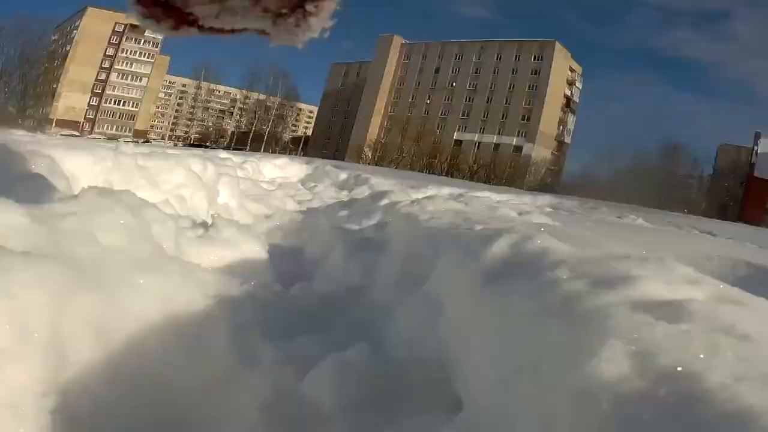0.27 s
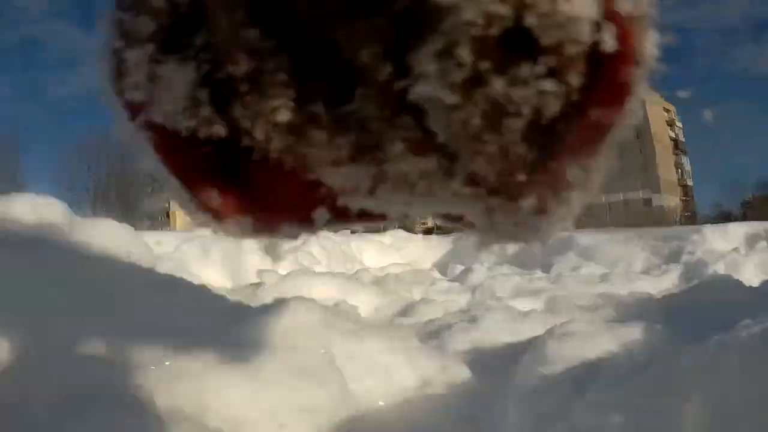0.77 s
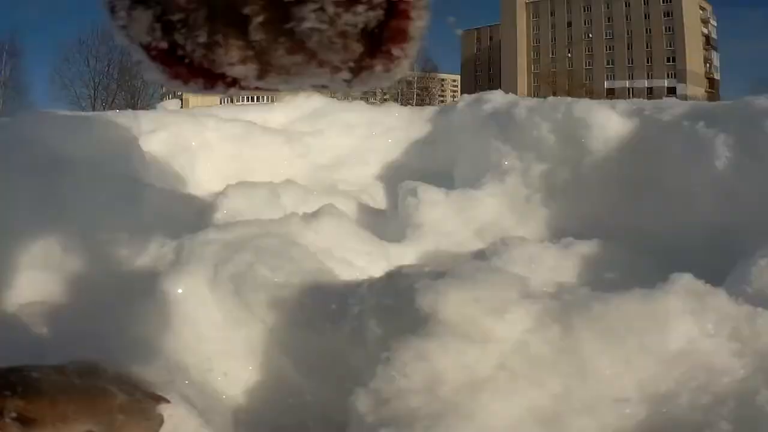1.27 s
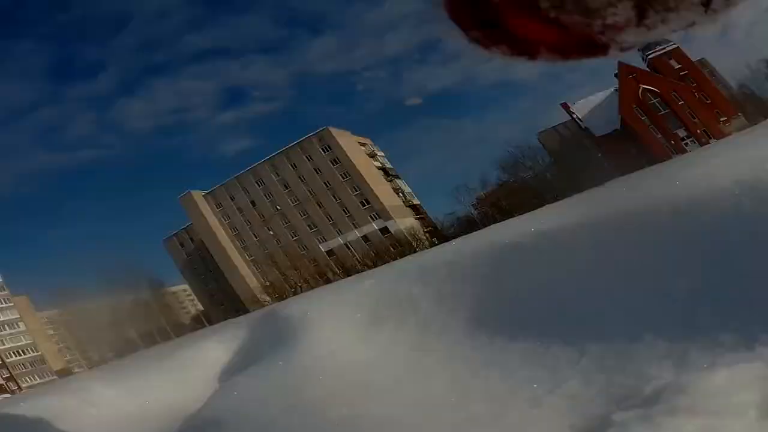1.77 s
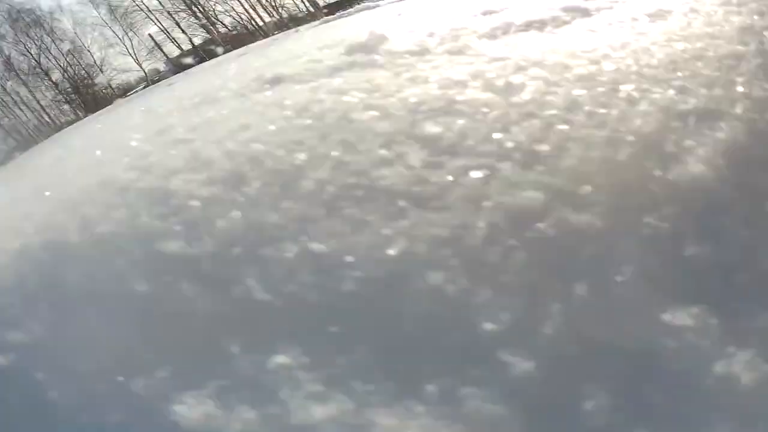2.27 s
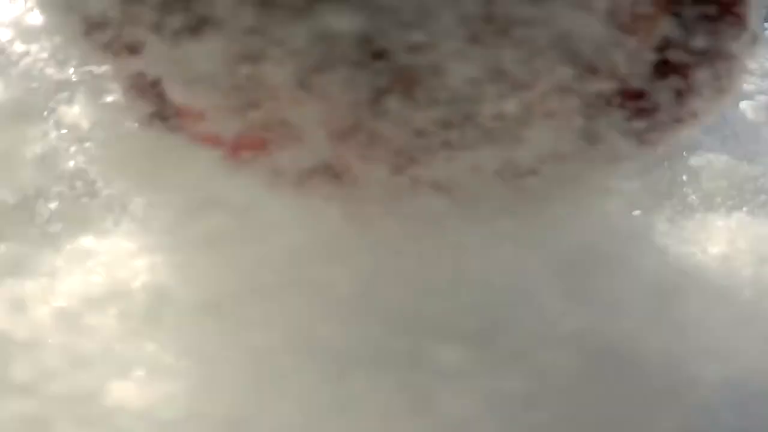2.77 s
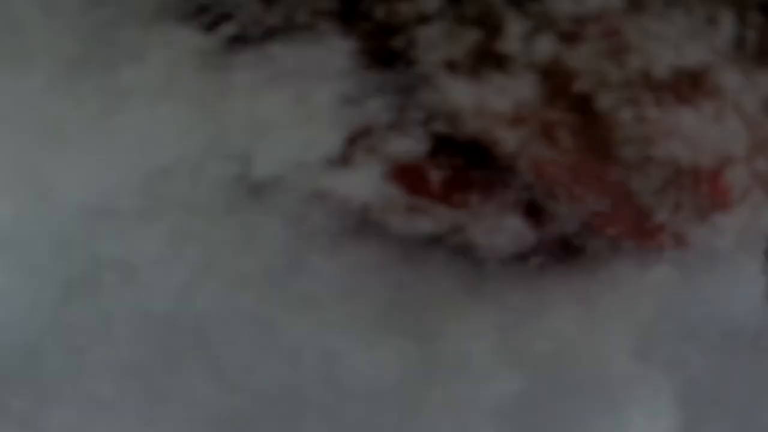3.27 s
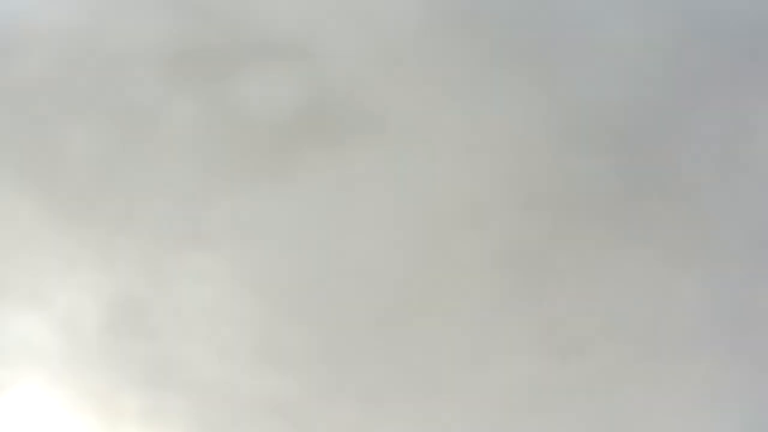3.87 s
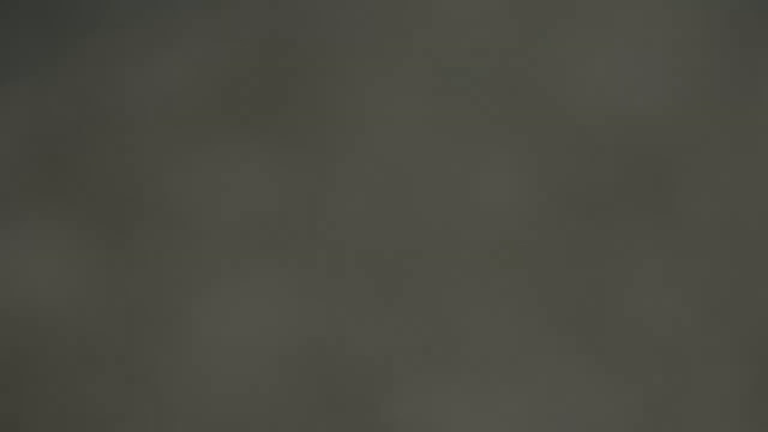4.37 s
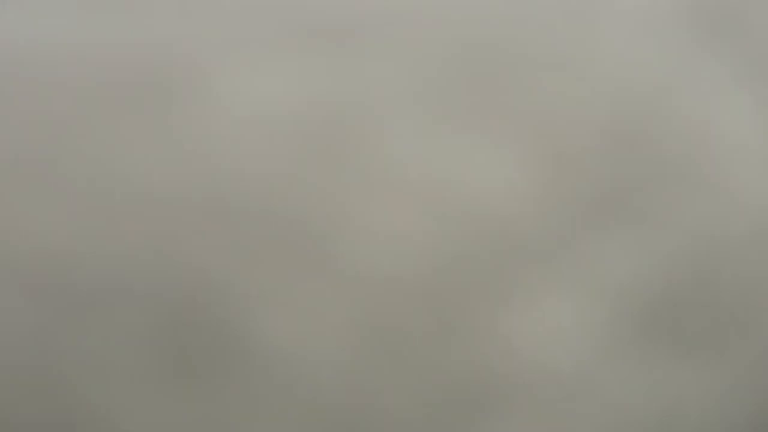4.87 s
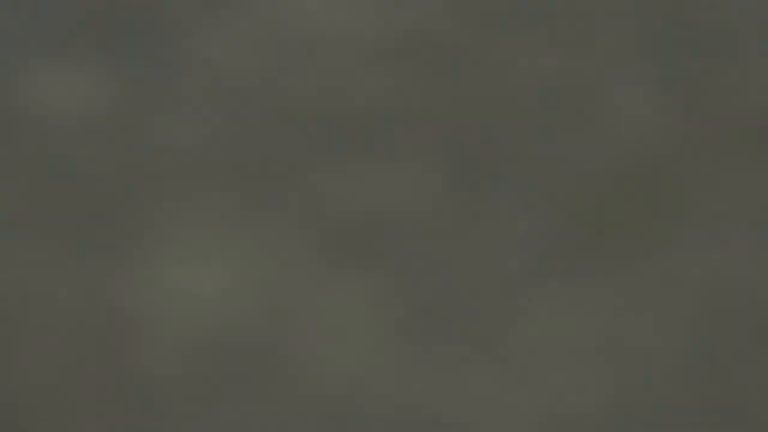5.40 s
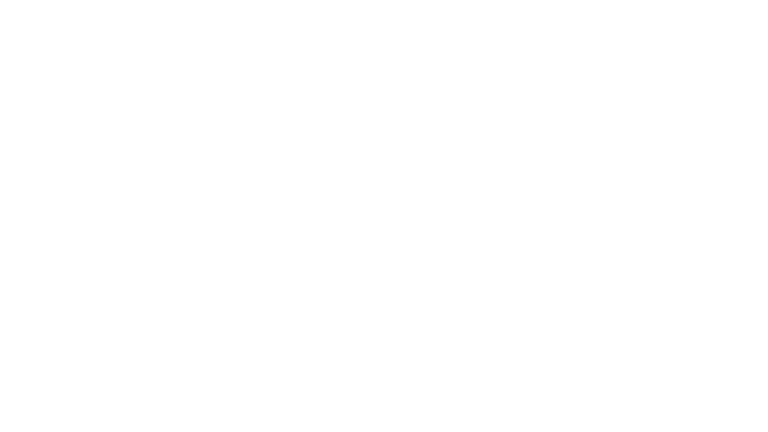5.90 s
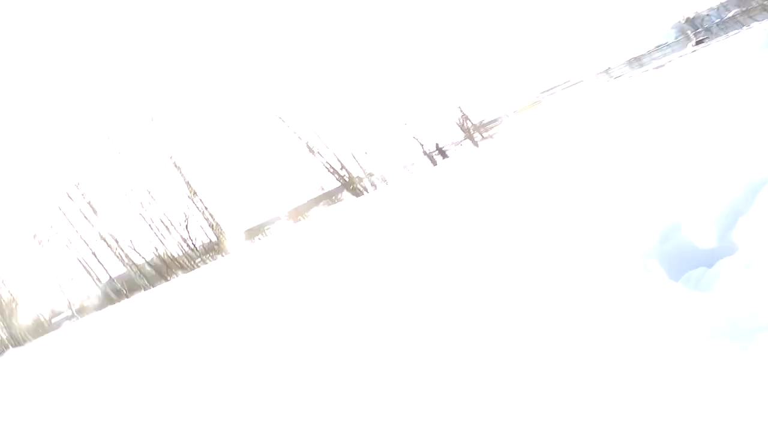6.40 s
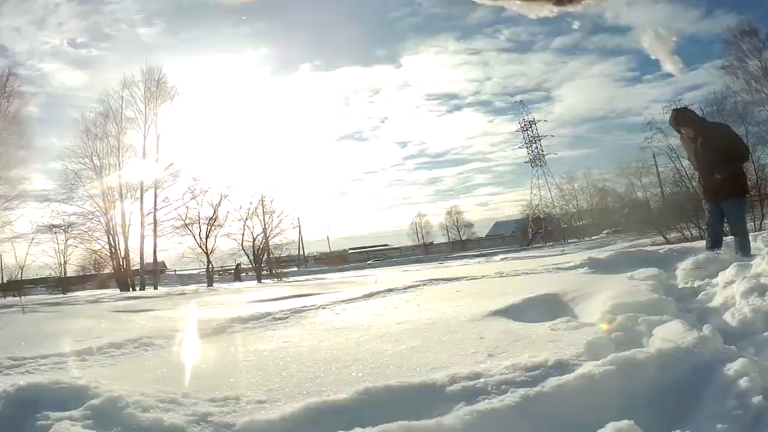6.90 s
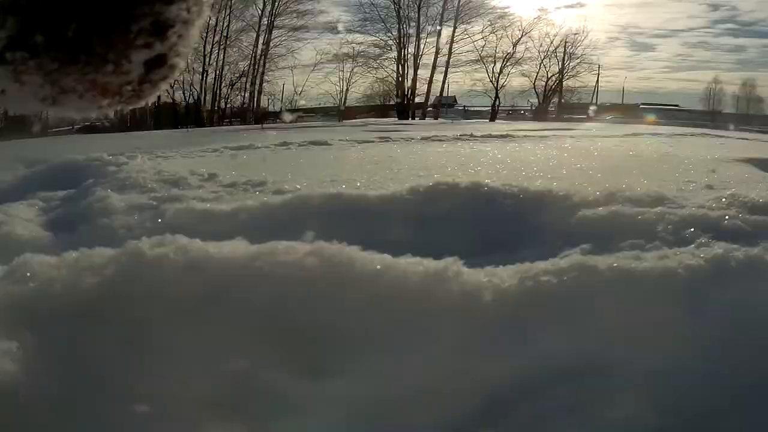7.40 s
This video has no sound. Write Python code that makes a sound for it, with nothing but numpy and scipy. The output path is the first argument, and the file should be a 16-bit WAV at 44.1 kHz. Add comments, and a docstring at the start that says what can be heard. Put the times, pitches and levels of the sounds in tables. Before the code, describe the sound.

Close on a small camera's own microphone, outdoors in snow. Irregular dry knocks hit the plastic shell, densest and loudest in the first two seconds, with a few thumps overloading. Low rumble and grainy snow crunches lie beneath. Later knocks thin out, snow hisses softly over the microphone around four to five seconds, a short gritty crunch follows near six, then small clicks fade into faint air noise.

```python
"""Small camera bumped and dragged through snow

Heard outdoors through the camera's own casing, over faint steady air and preamp noise.
Hard and dull knocks ring the plastic shell modes; pushes on the microphone port are pressure bumps
that overload it. Snow hisses as fluttering noise and crunches as random grains ringing the shell.
Slow handling rumble, made of low noise, lies underneath."""
import sys
import numpy as np
from scipy import signal
from scipy.fft import rfft, irfft
from scipy.io import wavfile
from scipy.ndimage import uniform_filter1d

SR = 44100
rng = np.random.default_rng(int(sys.argv[2]) if len(sys.argv) > 2 else 0)


def inscribe(sig):
    """Save sig as 16-bit PCM at rate SR to the path in sys.argv[1].

    A 1-D sig is mono; a 2-D sig holds one channel per row.
    Samples are clipped to [-1, 1] before scaling.
    """
    pcm = np.round(np.clip(np.atleast_2d(sig).T, -1, 1) * 32767)
    wavfile.write(sys.argv[1], SR, pcm.astype(np.int16))


N = 337365

# Knocks on the shell. Each row: start in seconds, peak in dB before the low-pass,
# centre of the sound in Hz (hard contacts are high).
KNOCKS = [(0.0464, -24.5, 990), (0.0552, -20.5, 833), (0.0704, -18, 764), (0.0835, -29.5, 1507),
          (0.0870, -22, 1507), (0.1185, -19.5, 1600), (0.1226, -19.5, 1218), (0.1386, 2.5, 2386),
          (0.241, -41, 4398), (0.303, -44, 772), (0.3731, -10.5, 3060), (0.4741, -35, 1500),
          (0.4875, -28.5, 1310), (0.4966, -5, 861.5), (0.518, -33, 800), (0.5656, -36.5, 763),
          (0.622, 10.5, 906.6), (0.653, -5.5, 3114), (0.683, -29.5, 770), (0.7174, -19.5, 1289),
          (0.73, -4.5, 3004), (0.8483, -16.5, 1288), (0.936, -33, 1204), (0.9955, 4, 1163),
          (1.0024, 3.5, 2354), (1.029, -38.5, 1322), (1.059, -32, 1714), (1.071, -26.5, 1261),
          (1.1029, -28, 880), (1.129, -35, 900), (1.141, -27.5, 1091), (1.1543, -25.5, 1156),
          (1.2332, -8.5, 1528), (1.2539, -35.5, 964), (1.2685, -33, 1328), (1.525, -11.5, 2278),
          (1.771, -18, 2240), (1.818, -27.5, 1806), (1.8644, -22.5, 1990), (1.9147, -21.5, 2150),
          (1.9319, -5, 1539), (1.9503, -6, 1110), (1.973, -30, 1502), (2.076, -46, 902),
          (2.101, -45.5, 1801), (2.1461, -46, 1034), (2.258, -43, 814.6), (2.285, -43, 1087),
          (2.333, -30, 730), (2.3378, -35, 820), (2.3775, -13.5, 2002), (2.3836, -29, 1772),
          (2.6104, -12, 885.6), (2.617, -18, 1014), (2.6379, -12.5, 895), (2.7215, -30.5, 1350),
          (2.848, -42, 598), (2.882, -39.5, 1069), (2.8926, -26, 863.5), (2.961, -36, 1117),
          (2.9848, -31.5, 1266), (3.0152, -37, 1410), (3.1343, -19, 1462), (3.1431, -20.5, 702),
          (3.177, -30.5, 909), (3.2664, -30.5, 1276), (3.3723, -30, 1419), (3.3768, -22.5, 1501),
          (3.432, -11, 3215), (3.4356, 1, 2105), (3.4397, -16, 2590), (3.4803, -12.5, 2986),
          (3.485, -16.5, 800), (3.653, -30, 1914), (3.677, -19, 1714), (3.6798, -15, 2540),
          (3.6837, -21.5, 2200), (3.842, -36, 2370), (3.918, -34.5, 1331), (3.942, -38.5, 1292),
          (4.007, -36, 1398), (4.181, -43.5, 791.6), (4.812, -23, 1104), (4.851, -28, 800),
          (4.897, -32.5, 1000), (4.989, -34, 1332), (4.9928, -37, 1611), (5.0399, -19.5, 700),
          (5.0468, -11.5, 844.7), (5.059, -23, 905), (5.0818, -32.5, 1357), (5.18, -33, 742),
          (5.904, -34.5, 1422), (5.9911, -35, 1169), (6.002, -42, 1300), (6.016, -44, 2970),
          (6.0583, -26, 983.3), (6.08, -30, 851.3), (6.1088, -18, 1465), (6.1133, -27, 1389),
          (6.155, -30, 1262), (6.212, -34, 694), (6.2295, -39.5, 939), (6.239, -24, 682),
          (6.3157, -36.5, 760), (6.352, -40.5, 702.7), (6.3666, -30, 1544), (6.4494, -9, 2230),
          (6.457, -27, 1979), (6.475, -12.5, 930), (6.5731, -28, 1236), (6.757, -58, 782.7),
          (6.9078, -49, 1060), (6.92, -38.5, 1290), (6.9489, -37, 525), (7.1024, -35, 1400),
          (7.187, -52, 1206), (7.3105, -24, 1166), (7.577, -49, 871)]
# Modes of the plastic shell. Each row: frequency in Hz, relative level in dB, t60 in seconds.
SHELL = [(590, -9, 0.007), (820, 1, 0.0028), (1200, 3, 0.0056), (1527, 2.5, 0.01), (2073, 0, 0.0047),
         (3102, -3.5, 0.0046), (3820, -6, 0.0054), (4640, -7.5, 0.0043), (5240, -8.5, 0.0046),
         (6680, 1, 0.0036), (8000, -7, 0.003)]
# How hard the camera is handled. Each row: time in seconds, rumble level in dB.
HANDLING = [(0.0, -38), (0.44, -43), (0.6, -31), (1.129, -43), (1.293, -36), (1.5, -52), (1.989, -40),
            (2.331, -50), (2.53, -41), (3.45, -35.5), (3.686, -41.5), (3.883, -37.5), (4.35, -57.5),
            (4.76, -48.5), (4.93, -34), (5.06, -38), (5.3, -43.5), (5.4, -59), (5.53, -69), (5.62, -44),
            (6.188, -41), (6.551, -34.5), (6.8, -63.5), (6.92, -47), (7.25, -55), (7.341, -45),
            (7.649, -48)]


def from_db(db):
    """Gain of a level in dB."""
    return 10 ** (np.asarray(db) / 20)


def rms_one(x):
    """Scaled to rms 1."""
    return x / np.sqrt(np.mean(x ** 2) + 1e-20)


def in_time(rows):
    """Joins (seconds, value) rows into a curve, one value a sample."""
    return np.interp(np.arange(N) / SR, *np.transpose(rows))


def drift(rate_hz):
    """Slow random curve of rms about 1: noise through a double pole at rate_hz."""
    step = 40   # samples between computed values
    pole = np.exp(-2 * np.pi * rate_hz * step / SR)
    white = rng.standard_normal(N // step + 2002)
    slow = signal.lfilter([1], [1, -2 * pole, pole ** 2], white)[2000:]   # settled part
    return np.interp(np.arange(N) / step, np.arange(len(slow)), rms_one(slow))


def coloured(x, spectrum):
    """Shaped by a (Hz, dB) spectrum joined on a log axis."""
    hz, level_db = np.transpose(spectrum)
    grid_hz = np.maximum(np.arange(N // 2 + 1) * SR / N, 1)
    gain_db = np.interp(np.log(grid_hz), np.log(hz), level_db)
    return irfft(rfft(x) * from_db(gain_db), N)


def add(out, start_s, sound):
    """Mixes a short sound in from start_s."""
    i = max(round(start_s * SR), 0)
    out[i:i + len(sound)] += sound[:N - i]


def in_band(x, lo_hz, hi_hz):
    """Scaled so that the given band has rms 1."""
    sos = signal.butter(4, [lo_hz, hi_hz], "band", fs=SR, output="sos")
    return x / np.std(signal.sosfilt(sos, x))


def packing(tail):
    """Bursts of pressure that swell fast and die slower: gains of the ringing and of the dull part."""
    # Snow packing against the shell. Each row: middle in seconds, crunch level in dB, length in ms,
    # dull thud against the crunch in dB.
    scrape_rows = [(0.064, -49, 71, 6), (0.301, -59, 18, 13.5), (1.2, -52.5, 110, -4),
                   (0.843, -45.5, 13, -3), (1.291, -58, 40, -1.5), (1.388, -64.5, 53, -4),
                   (0.491, -40.5, 18, 7), (0.555, -63, 150, 10), (0.719, -29, 14, -6.5),
                   (1.251, -49, 28, -6.5), (1.822, -63, 112, 5), (1.943, -34.5, 24, 4.5),
                   (2.008, -57.5, 25, 0.5), (2.343, -51.5, 54, 5), (2.566, -52.5, 74, -5.5),
                   (2.629, -43.5, 45, 1.5), (2.733, -42, 26, -13.5), (2.81, -62.5, 58, -6),
                   (2.889, -51, 25, 13.5), (3.062, -58.5, 30, 6.5), (3.147, -35.5, 20, 1.5),
                   (3.316, -60.5, 20, 0), (3.46, -39, 58, -12.5), (3.683, -37, 24, -5.5),
                   (4.12, -68, 270, 10.5), (4.551, -67, 270, 9), (4.821, -45.5, 31, 3), (5.185, -50, 31, 3),
                   (5.772, -26.5, 70, -20.5), (5.895, -54, 53, -6), (6.031, -61.5, 90, 6),
                   (6.133, -54, 37, 5), (6.223, -57.5, 25, 6.5), (6.32, -56, 34, 4), (6.458, -52, 34, 3.5),
                   (6.915, -57.5, 27, 2.5), (7.079, -67.5, 50, -0.5)]
    shake_db, shake_follows, shake_ms, shake_late_s = -39, 0.53, 6.8, 0.0041
    shake_thud_db, thud_fall_db = 6, 9   # the thud falls per octave of knock centre above 1 kHz
    shaken_rows = []   # every knock shakes the snow
    for s, peak_db, centre_hz in KNOCKS:
        level_db = shake_db + shake_follows * peak_db
        thud_db = shake_thud_db - thud_fall_db * np.log2(centre_hz / 1000)
        shaken_rows.append((s + shake_late_s, level_db, shake_ms, thud_db))

    ringing, dull = np.zeros((2, N))
    for s, level_db, ms, thud_db in [*scrape_rows, *shaken_rows]:
        t = np.arange(-ms, 3 * ms, 1000 / SR) / ms
        falloff = np.where(t < 0, 4 * t ** 2, (np.abs(t) / tail) ** 1.5)
        burst = from_db(level_db) * np.exp(-falloff)
        add(ringing, s - ms / 1000, burst)
        add(dull, s - ms / 1000, burst * from_db(thud_db))
    return ringing, dull


def still_air():
    """Still air and preamp: steady coloured noise."""
    # Noise spectrum. Each row: frequency in Hz, relative level in dB per Hz.
    air_spectrum = [(120, -35.5), (200, 6), (1560, -18.5), (7000, -28.5), (12000, -34.5), (15500, -46)]
    rms_db = -77.5
    return from_db(rms_db) * rms_one(coloured(rng.standard_normal(N), air_spectrum))


def rumble(sway_db, lump_db, lumpy_db, lumps_per_s, jolt_db, jolt_hz):
    """Handling and air on the port: slow swell, lumps of low noise, a low jolt under each snow burst."""
    # Slow pressure swell. Each row: frequency in Hz, relative level in dB per Hz.
    sway_spectrum = [(4, -6.5), (12, 7.5), (28, -5.5), (55, -28), (3000, -120)]
    # Lumps of low noise. Each row: frequency in Hz, relative level in dB per Hz.
    lump_spectrum = [(20, -16), (60, -3), (125, -7.5), (300, -36.5), (3000, -81)]
    sway = coloured(rng.standard_normal(N) * from_db(sway_db * drift(4)), sway_spectrum)
    lumps = coloured(rng.standard_normal(N) * from_db(lumpy_db * drift(lumps_per_s)), lump_spectrum)
    noise = in_band(sway, 15, 120) + from_db(lump_db) * rms_one(lumps)

    jolt_band = signal.butter(2, [0.73 * jolt_hz, 1.8 * jolt_hz], "band", fs=SR)
    jolt = signal.lfilter(*jolt_band, rng.standard_normal(N))
    _, dull = packing(tail=0.85)
    swell = uniform_filter1d(dull, size=SR // 80)
    return from_db(in_time(HANDLING)) * noise + from_db(jolt_db) * swell * rms_one(jolt)


def crunch(dense_per_s, lone_per_s, lone_db, spread_db, clump_db, tilt_db, dull_hz):
    """Snow grains break against the shell, densely in bursts and singly while it is handled."""
    ringing, dull = packing(tail=0.51)
    lone = from_db(in_time(HANDLING) + lone_db)
    fine = (ringing / (ringing + dull + lone)) ** 2   # dull lumps come in fewer, larger grains
    per_s = lone_per_s + dense_per_s * fine
    sizes = from_db(spread_db * np.minimum(rng.exponential(1, N), 5)) * rng.choice([-1, 1], N)
    breaks = rng.random(N) < per_s / SR
    clumping = from_db(clump_db * (1 - .55 * fine) * drift(45))
    grains = sizes * breaks / np.sqrt(per_s) * clumping + 1e-18

    rings = np.zeros(N)
    for k, (hz, mode_db, t60_s) in enumerate(SHELL):
        pole, w = from_db(-60 / (t60_s * SR)), 2 * np.pi * hz / SR
        ring = signal.lfilter([0, np.sin(w)], [1, -2 * pole * np.cos(w), pole ** 2], grains)
        level_db = mode_db + tilt_db * np.log2(hz / 1450)
        rings += (-1) ** k * from_db(level_db) * ring
    rings = signal.lfilter(*signal.butter(3, dull_hz, fs=SR), rings)
    thuds = signal.lfilter(*signal.butter(2, [65, 700], "band", fs=SR), grains)
    return (ringing + lone) * in_band(rings, 700, 3000) + (dull + lone) * in_band(thuds, 200, 700)


def hiss(flutter_db, shift_db, grain_db):
    """Fine snow sliding over the port: grainy noise that flutters, each band shifting on its own."""
    # Spectrum of the sliding snow. Each row: frequency in Hz, relative level in dB per Hz.
    hiss_spectrum = [(150, -25.5), (240, -5.5), (400, -2.5), (800, -5.5), (1420, 1.5), (2000, -5),
                     (2350, -5.5), (2650, 0), (2950, -5), (3400, -8), (3900, -4.5), (4500, -10),
                     (10300, -13), (11400, -10.5), (15500, -27.5)]
    # Snow swishing over the port. Each row: middle in seconds, hiss level in dB, length in ms.
    swish_rows = [(0.655, -54, 29), (0.725, -75, 33), (1.643, -66.5, 53), (1.805, -61, 57),
                  (2.534, -55.5, 55), (2.642, -60, 53), (2.737, -62, 68), (2.907, -72.5, 200),
                  (3.109, -74, 146), (3.476, -46.5, 31), (3.684, -44.5, 36), (3.774, -63.5, 142),
                  (4.044, -60.5, 101), (4.149, -60, 126), (4.35, -68.5, 153), (4.51, -61, 166),
                  (4.67, -74, 310), (4.803, -54.5, 150), (4.936, -54, 73), (5.198, -53.5, 94),
                  (5.352, -77, 110), (5.592, -72.5, 47), (5.665, -71.5, 170), (5.767, -51.5, 85),
                  (5.925, -67.5, 53), (6.021, -70, 32), (6.149, -71.5, 46), (6.68, -81, 36)]
    rest_db = -87.5   # faint hiss between swishes
    steepness = 2.4   # of swell and fade

    grainy = coloured(rng.standard_normal(N) * from_db(grain_db * drift(250)), hiss_spectrum)
    edges_hz = [100, 1000, 2200, 3200, 4600, 9000, 17000]
    mixed = np.zeros(N)
    for k, band_hz in enumerate(zip(edges_hz, edges_hz[1:])):
        band = signal.sosfilt(signal.butter(3, band_hz, "band", fs=SR, output="sos"), grainy)
        mixed += (-1) ** k * band * from_db(shift_db * drift(15))
    noise = from_db(flutter_db * drift(21)) * mixed

    level = np.full(N, from_db(rest_db))
    for s, level_db, ms in swish_rows:
        t = np.arange(-2 * ms, 2 * ms, 1000 / SR) / (.5 * ms)
        add(level, s - 2 * ms / 1000, from_db(level_db) * np.exp(-np.abs(t) ** steepness))
    return level * in_band(noise, 5000, 8300)


def knocks(spread_db, detune, chatter, slope_db, above_db, soft_db, thin):
    """Each knock is a brief uneven contact that rings all shell modes, most those near its centre."""
    hz, mode_db, t60_s = np.transpose(SHELL)[:, :, None]
    modes, contact_len = len(SHELL), SR // 200
    t = np.arange(SR // 40) / SR
    decay = from_db(-60 * t / t60_s)
    out = np.zeros(N)
    for s, peak_db, centre_hz in KNOCKS:
        octaves = np.log2(hz / centre_hz)
        near_db = slope_db * np.minimum(octaves, 0) - above_db * np.maximum(octaves, 0)
        strength_db = mode_db + near_db + spread_db * rng.standard_normal((modes, 1))
        pitch_hz = hz * (1 + detune * rng.standard_normal((modes, 1)))   # the grip shifts the modes
        rings = from_db(strength_db) * decay * np.sin(2 * np.pi * pitch_hz * t)
        # the surfaces grate briefly
        contact = chatter * rng.standard_normal(contact_len) * np.exp(-t[:contact_len] / .0008)
        contact[0] = -1
        knock = np.convolve(rings.sum(axis=0), contact)
        edge_hz = centre_hz * from_db(soft_db * np.log2(centre_hz / 700))   # soft contacts are dull
        knock = signal.lfilter(*signal.butter(3, np.clip(edge_hz, 100, 18000), fs=SR), knock)
        knock = signal.lfilter(*signal.butter(2, thin * centre_hz, "high", fs=SR), knock)   # hard: thin
        add(out, s, from_db(peak_db) * knock / np.abs(knock).max())
    knock_lowpass_hz = 8600
    return signal.sosfilt(signal.cheby2(10, 40, knock_lowpass_hz, fs=SR, output="sos"), out)


def pushes():
    """Pushes on the microphone port: smooth one-sided pressure bumps."""
    # Each row: middle in seconds, signed peak pressure (1 is full scale, before the coupling),
    # length in ms.
    push_rows = [(0.0712, 0.12, 1.2), (0.1256, -0.07, 3.6), (0.2995, -0.038, 2.5), (0.4987, 0.244, 1.7),
                 (0.6215, -1.9, 0.9), (0.626, 0.5, 5.5), (0.637, 0.13, 11), (0.7295, 0.061, 1.5),
                 (0.9976, 0.12, 2.0), (1.238, -0.09, 2.6), (1.2598, -0.049, 8.0), (1.9313, -1.9, 2.8),
                 (1.936, -0.4, 6.0), (1.962, 0.1, 26), (1.9508, 0.251, 1.2), (2.3341, 0.043, 2.5),
                 (2.6192, 0.237, 1.9), (2.628, -0.1, 4.0), (2.6413, -0.36, 1.7), (2.664, 0.14, 24),
                 (2.8904, 0.107, 1.6), (3.09, 0.12, 28), (3.1465, -0.16, 6.0), (3.1551, -2.34, 2.96),
                 (3.1576, -0.35, 1.8), (3.173, -0.12, 9.0), (3.4364, -0.378, 2.0), (3.4868, -0.15, 1.5),
                 (3.8227, -0.036, 2.5), (3.9403, -0.04, 2.5), (4.8259, -0.07, 2.6), (4.8496, 0.056, 1.8),
                 (4.9475, -0.03, 5.0), (4.967, 0.13, 16), (4.984, 0.08, 16), (5.0372, 0.05, 2.5),
                 (5.1813, 0.066, 1.7), (5.947, 0.04, 9.0), (6.061, 0.07, 2.2), (6.1097, 0.043, 2.4),
                 (6.1384, -0.069, 3.1), (6.2408, -0.111, 1.9), (6.452, 0.062, 1.9), (6.4722, -0.138, 1.3),
                 (6.95, -0.033, 2.0), (7.312, -0.026, 3.0)]
    out = np.zeros(N)
    for s, pressure, ms in push_rows:
        t_ms = np.arange(-2 * ms, 2 * ms, 1000 / SR)
        add(out, s - 2 * ms / 1000, pressure * np.exp(-np.abs(t_ms / (.6 * ms)) ** 3))
    return out


def scene():
    """Sums all sounds at one capsule."""
    air = still_air()
    handling = rumble(sway_db=2.0, lump_db=-12.5, lumpy_db=7.5, lumps_per_s=27.0, jolt_db=2.0,
                      jolt_hz=125)
    grit = crunch(dense_per_s=5000, lone_per_s=410, lone_db=-37.5, spread_db=2.5, clump_db=6.5,
                  tilt_db=-0.5, dull_hz=3720)
    slide = hiss(flutter_db=1.5, shift_db=2.5, grain_db=1.5)
    blows = knocks(spread_db=3.5, detune=0.033, chatter=0.29, slope_db=24.5, above_db=3.0,
                   soft_db=7.5, thin=0.45)
    return (air + handling + grit + slide + blows + pushes())[None]


def record(dry):
    """The coupling capacitor makes pushes swing back, the converter clips flat, the top is cut."""
    coupling_hz, overload, cutoff_hz = 25.7, 1, 15800
    coupled = signal.lfilter(*signal.butter(1, coupling_hz, "high", fs=SR), dry)
    clipped = np.clip(coupled, -overload, overload)
    return signal.sosfilt(signal.ellip(12, .1, 70, cutoff_hz, fs=SR, output="sos"), clipped)


dry = scene()
out = record(dry)
inscribe(out)
```